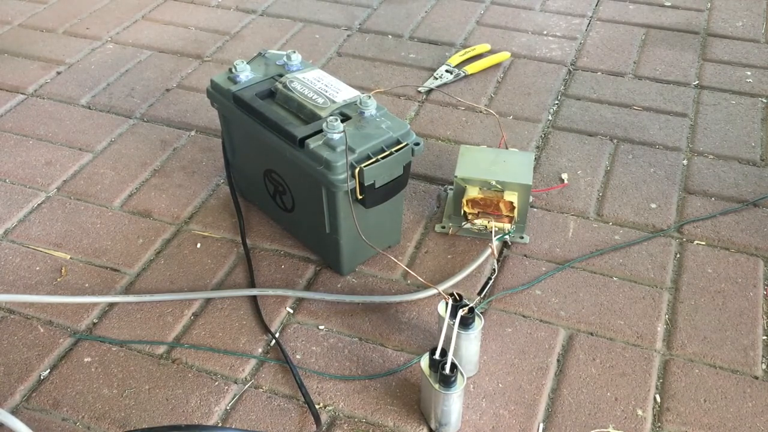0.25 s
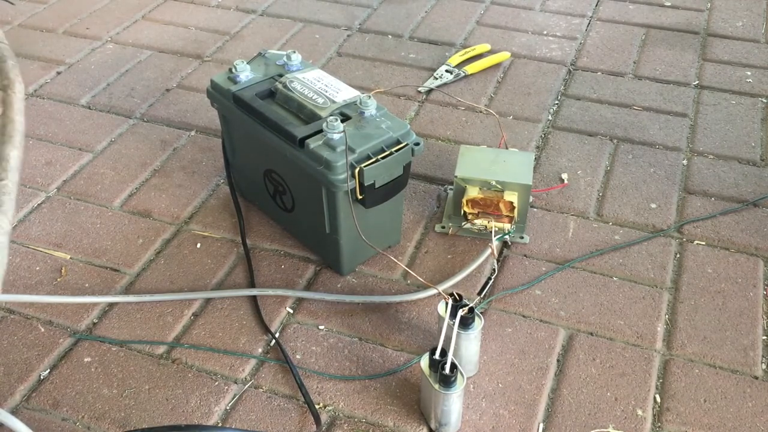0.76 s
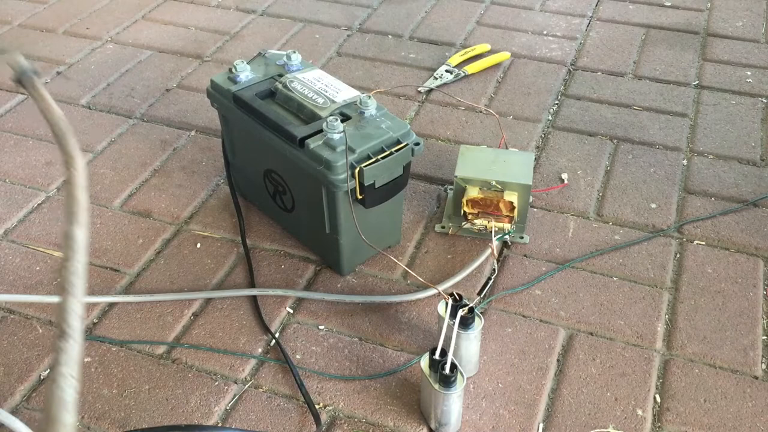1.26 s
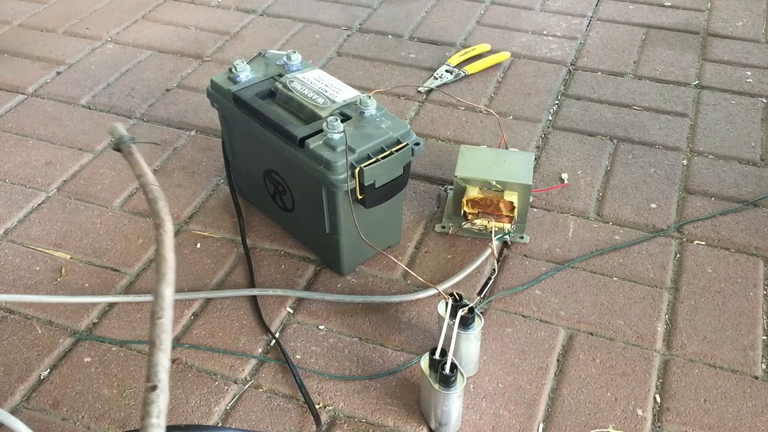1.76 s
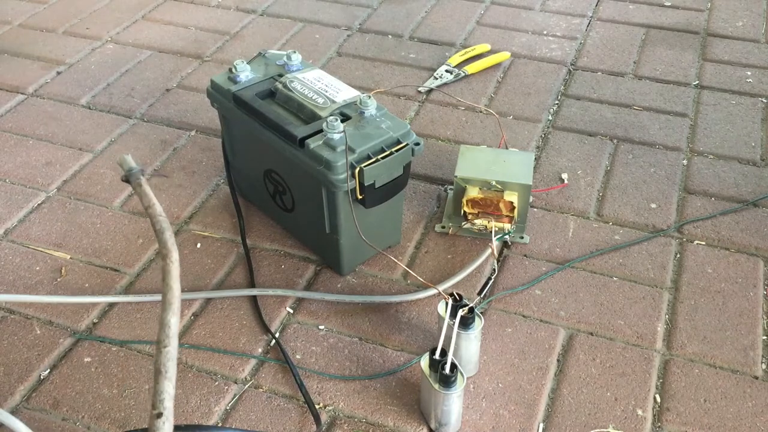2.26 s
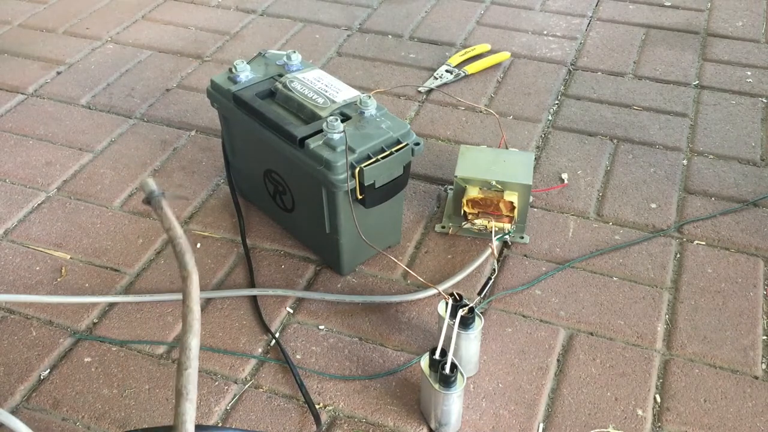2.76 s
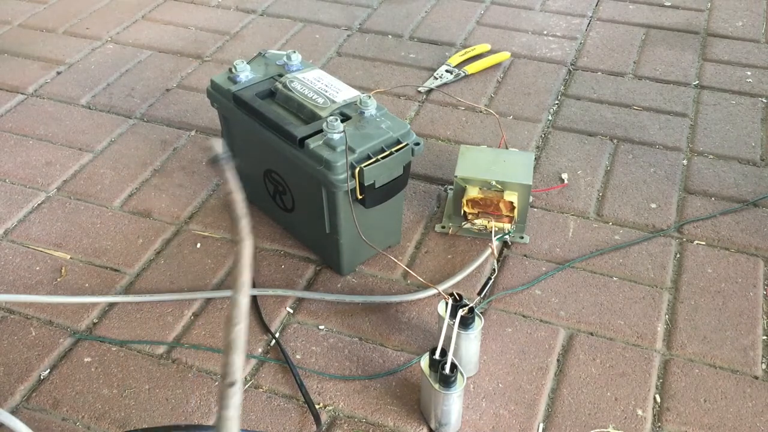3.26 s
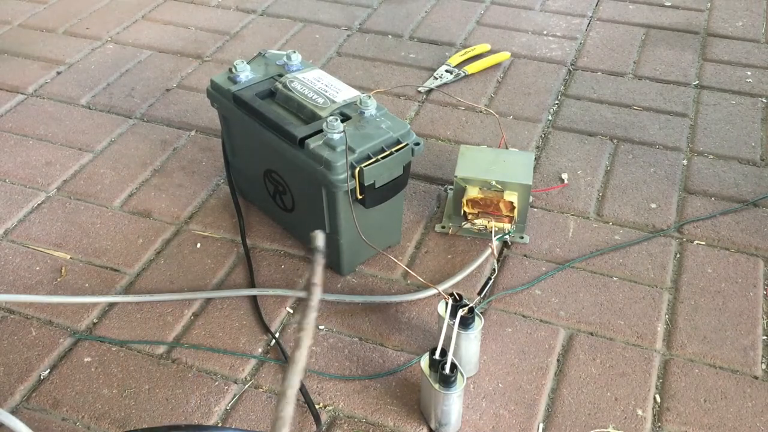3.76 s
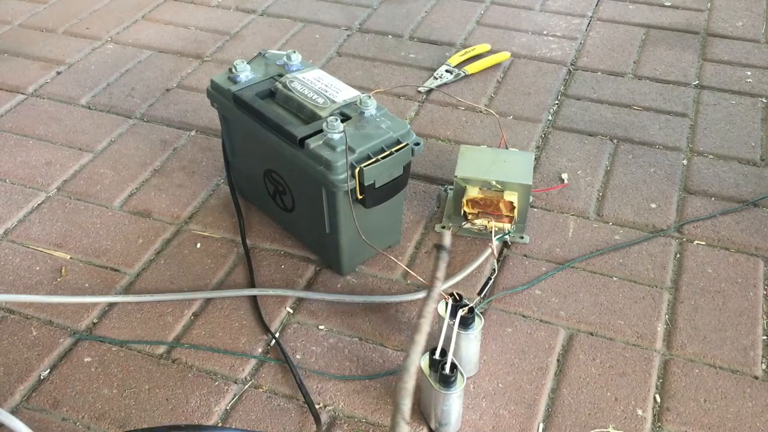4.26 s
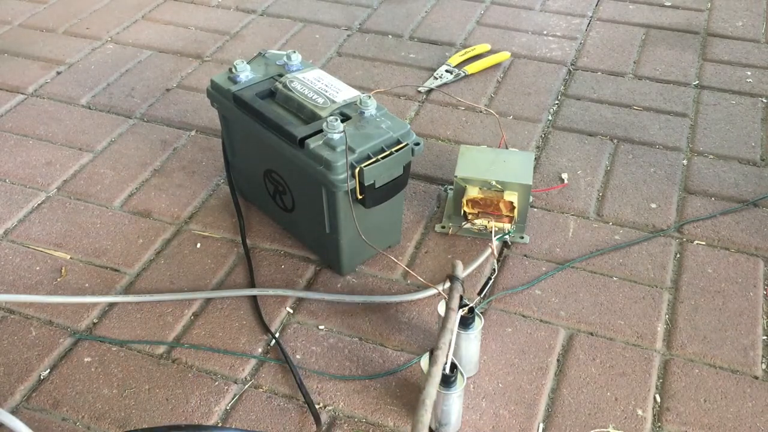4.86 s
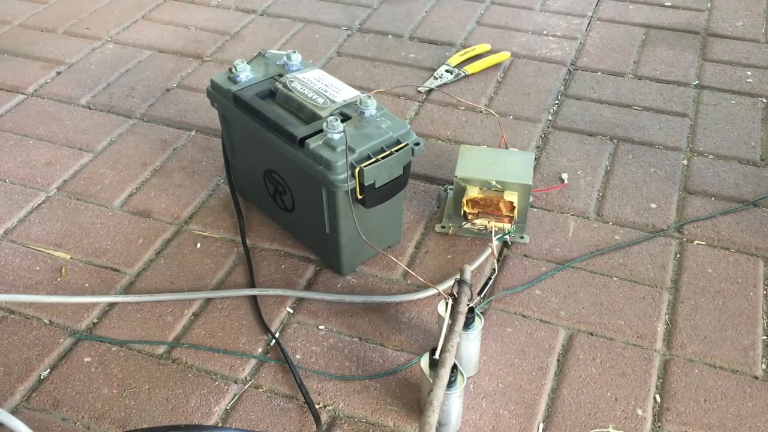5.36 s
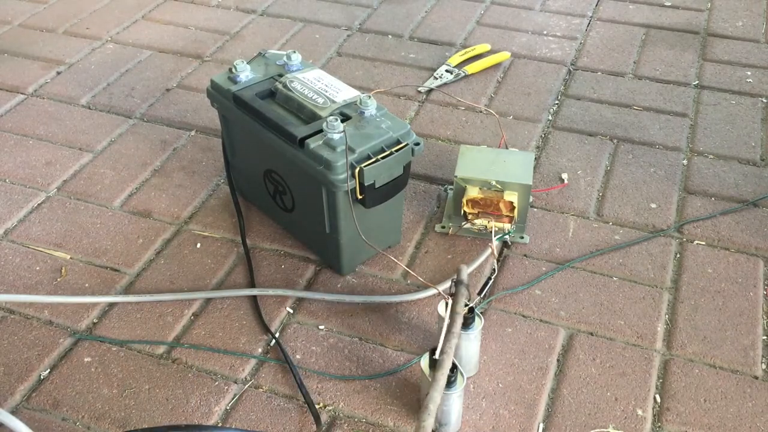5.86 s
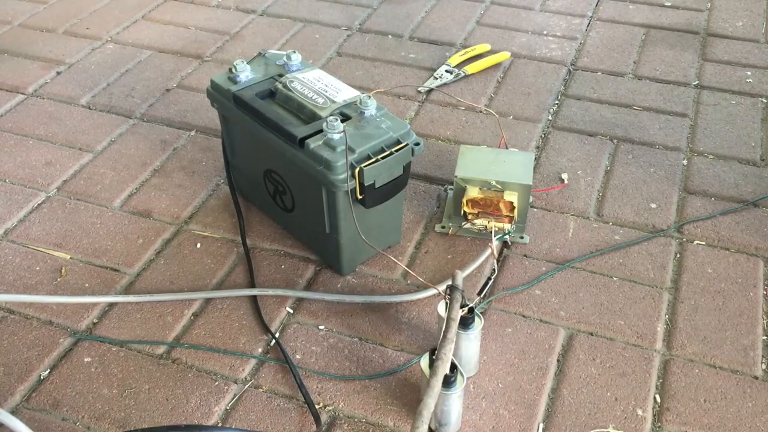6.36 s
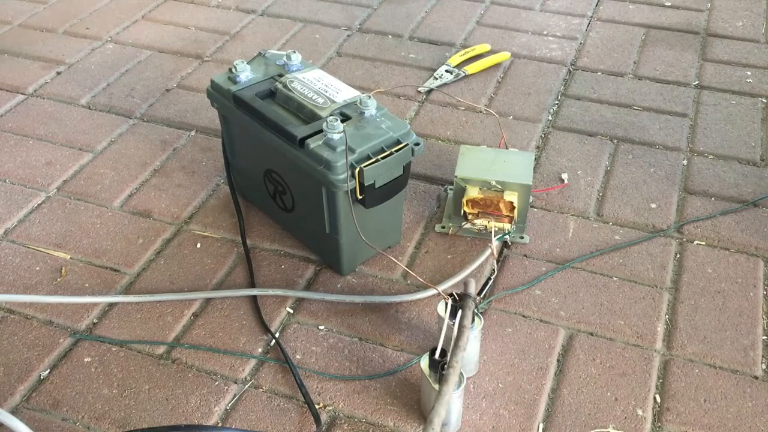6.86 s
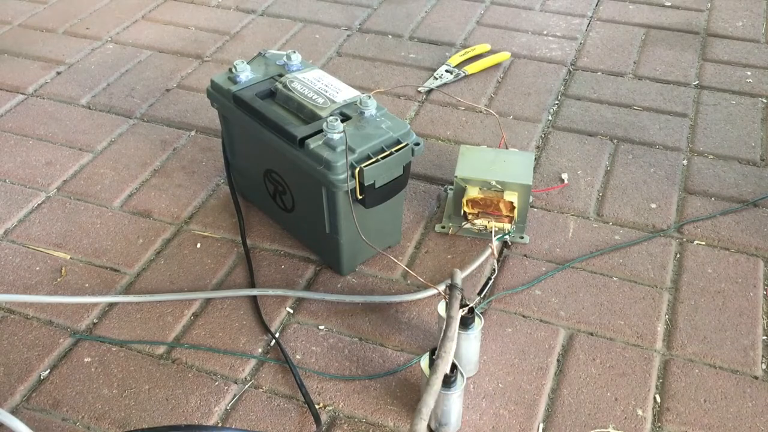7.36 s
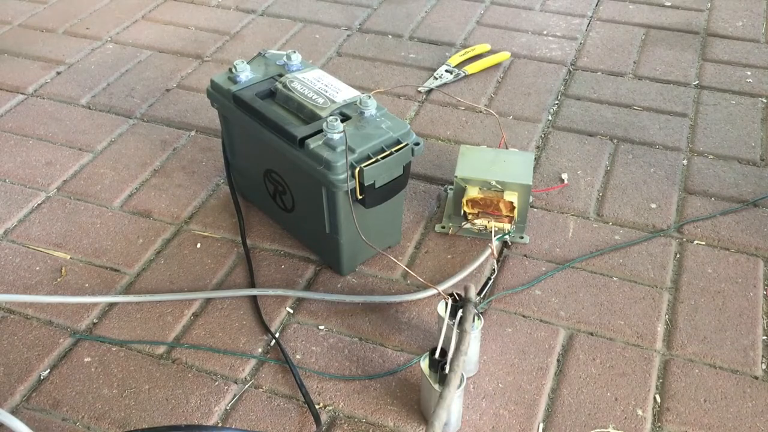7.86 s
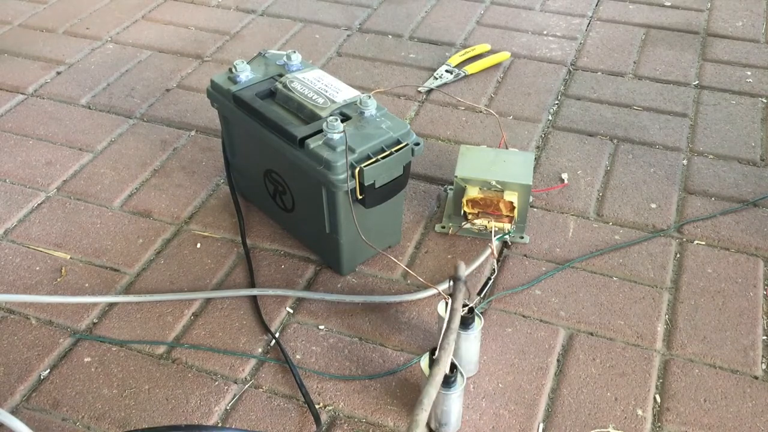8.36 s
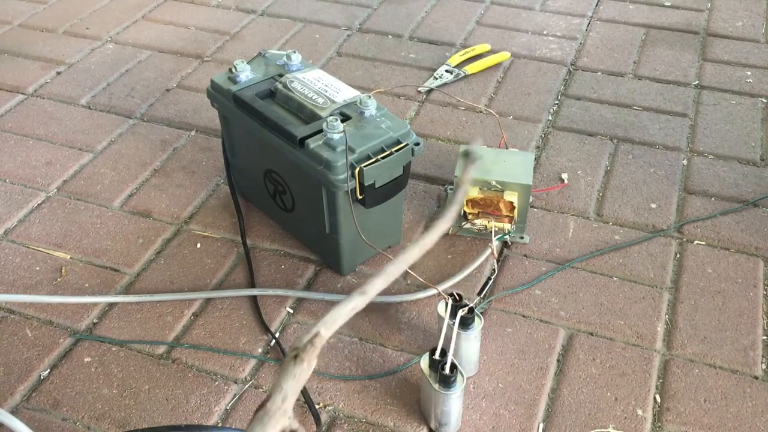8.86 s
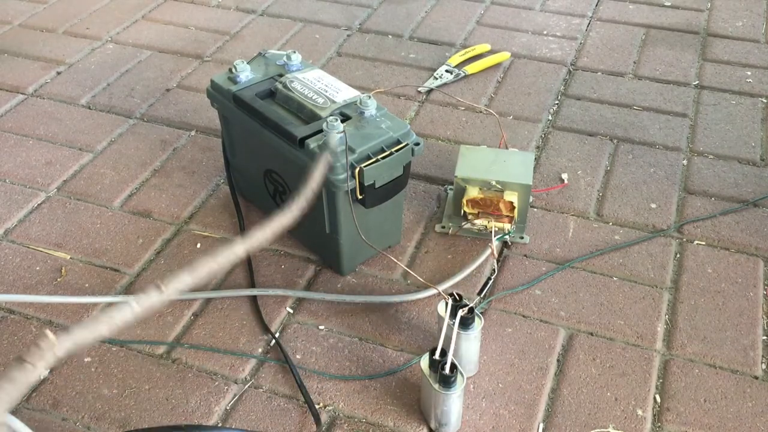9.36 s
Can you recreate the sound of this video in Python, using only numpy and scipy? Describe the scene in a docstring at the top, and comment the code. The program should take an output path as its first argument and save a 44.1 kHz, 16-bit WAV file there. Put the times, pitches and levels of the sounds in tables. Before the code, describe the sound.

Faint mains hum outdoors, a sudden sharp high-voltage snap with brief metal ringing, then light stick ticks on metal amid wind, chirps and rasping insects.

```python
"""One sharp crack with a tiny spark before it: charged high-voltage capacitors short on a brick patio.
Noise shocks make the crack, the yard scatters it, and decaying sines ring on in the jolted metal.
The transformer's steady sines stop at the crack; later a stick taps, rubs and nudges the metal.
Around it: gusts of filtered noise for light wind, pulsed tones and noise bands for rasping insects,
gliding tones for distant birds, and a soft outdoor wash."""
import sys
import numpy as np
from scipy import signal
from scipy.fft import rfft, irfft
from scipy.io import wavfile
from scipy.ndimage import uniform_filter1d

SR = 44100
rng = np.random.default_rng(int(sys.argv[2]) if len(sys.argv) > 2 else 0)


def to_wav(sig):
    """Store sig (one row per channel, or 1-D mono) as 16-bit WAV at the path in sys.argv[1].

    Samples outside -1..1 are clipped; the rate is SR.
    """
    pcm = np.clip(np.atleast_2d(sig), -1, 1) * 32767
    pcm = np.round(pcm).astype(np.int16)
    wavfile.write(sys.argv[1], SR, pcm.T)  # frames by channels


N = 424683
TIME = np.arange(N) / SR

# pressure shocks of the discharge and their first bounces: (time [s], level [dB], nominal decay time [s])
DISCHARGE_SHOCKS = [(2.6095, -37, .008), (2.614, -26, 0.0023), (2.6156, -11, .002), (2.6161, -7, 0.0016),
                    (2.618, -15.5, 0.0041), (2.6212, -11, 0.001)]
STRIKE_S = DISCHARGE_SHOCKS[2][0]  # the first strong shock


def gain_of(db):
    """Decibels to amplitude."""
    return 10 ** (np.asarray(db) / 20)


def evened(x):
    """Scales to rms 1."""
    return x / np.sqrt(np.mean(x ** 2) + 1e-20)


def read(points, hz):
    """Interpolates a frequency table on a log-frequency axis."""
    f, value = np.transpose(points)
    return np.interp(np.log(hz + 1), np.log(f + 1), value)


def add(mix, s, sound):
    """Mixes a sound in at time s, cut at the end of the mix."""
    part = mix[max(round(s * SR), 0):][:len(sound)]
    part += sound[:len(part)]


def noise(colour):
    """Steady noise with the given spectrum, rms 1."""
    hz = np.fft.rfftfreq(N, 1 / SR)
    spectrum = rfft(rng.standard_normal(N)) * gain_of(read(colour, hz))
    return evened(irfft(spectrum, N))


def band(centre_hz, width_hz):
    """Noise in one bell-shaped band, rms 1; around 0 Hz it is a slow random drift."""
    hz = np.fft.rfftfreq(N, 1 / SR)
    bell = np.exp(-((hz - centre_hz) / width_hz) ** 2)
    return evened(irfft(rfft(rng.standard_normal(N)) * bell, N))


def causal(colour, size=4096):
    """Minimum-phase impulse response of a spectrum, energy 1."""
    level_db = read(colour, abs(np.fft.fftfreq(size, 1 / SR)))
    log_gain = np.log(gain_of(np.maximum(level_db, -80)))
    response = np.fft.ifft(np.exp(np.conj(signal.hilbert(log_gain)))).real[:size // 2]
    return response / np.linalg.norm(response)


def modes(table, size=SR // 2):
    """Decaying sines of a struck object, from rows of (pitch [Hz], level [dB], t60 [s])."""
    t = TIME[:size]
    return sum(gain_of(db - 60 * t / t60) * np.sin(2 * np.pi * hz * t) for hz, db, t60 in table)


def spells(rows, rise_s, fall_s):
    """Gain over time of a source that comes and goes: each spell rises, holds and falls."""
    gain = 0
    for start, end, db in rows:
        ramp = np.minimum((TIME - start) / rise_s, (end - TIME) / fall_s)
        gain = gain + gain_of(db) * np.clip(ramp, 0, 1)
    return gain


def burst(decay_s, rise_s=.0003):
    """A sudden puff of noise that dies away, about equally strong at all pitches."""
    t = TIME[:SR // 10]
    shape = np.exp(-t / decay_s)
    rise = 1 - np.exp(-t / rise_s)
    spectrum = rfft(rise * shape * rng.standard_normal(len(t)))
    flat = irfft(spectrum / (abs(spectrum) + 1e-12), len(t))
    # flattening smears the puff in time, so it is shaped again, gently
    puff = flat * rise * shape ** (1 / 4)
    return evened(puff) * np.sqrt(np.mean(shape ** 2))


def yard_tail(size=256, clump_db=1.5):
    """Uneven clumps of scatter from paving, walls and plants, treble dying first; energy 1."""
    # reverberation time of the yard: (frequency [Hz], t60 [s])
    yard_t60 = [(250, 0.33), (1000, 0.29), (2500, 0.23), (5000, .21), (9000, .2), (14000, .18)]
    hz, t, z = signal.stft(rng.standard_normal(SR), SR, nperseg=size)
    z = z * gain_of(clump_db * rng.standard_normal(len(t)))
    decay = gain_of(-60 * t / read(yard_t60, hz)[:, None])
    tail = signal.istft(z * decay, SR, nperseg=size)[1]
    return tail / np.linalg.norm(tail)


def discharge(echo_db=3, echo_delay_s=.003, case_db=-2, ring_hz=1143.4, ring_s=1.05):
    """A tiny first spark, the main shocks, the yard's echo and the jolted metal, its ring cut off near ring_s."""
    # colour of the shocks: (frequency [Hz], density [dB per Hz])
    crack_colour = [(80, -44), (200, -29), (330, -8.5), (640, -14), (1250, -11), (2000, -14.5),
                    (3400, -11.5), (4300, -6.5), (5000, -8), (6300, -4), (7900, -4), (9400, 3), (10600, -7),
                    (11800, -3.5), (12900, -16), (15100, -8), (16000, -19)]
    # colour of the yard's echo: (frequency [Hz], density [dB per Hz])
    yard_colour = [(100, -40), (240, -14), (350, -1), (650, -7.5), (1400, -2), (2300, -1), (3200, -4.5),
                   (4400, -3), (5000, -4), (7000, -0.5), (9300, 2.5), (10500, -5), (15800, -11.5)]
    # short rings of the cans, case and leads: (pitch [Hz], level before case_db [dB], t60 [s])
    case_modes = [(350, -32, .18), (474, -33.5, .13), (556, -44, .35), (799, -34, .18), (933, -40, .16),
                  (1111, -35, .13), (1180, -32.5, .14), (1312, -36.5, .13), (1469, -31.5, .16),
                  (1876, -38, .12), (2206, -34, .12), (2251, -41.5, .45), (2278.5, -42.5, .45),
                  (3031, -35, .12), (4242, -32, .12), (4549, -31, .1), (5901, -29, .11), (6230, -29, .1),
                  (6900, -28, .08), (8457, -26, .07), (9140, -26, .11), (9425, -19, .05)]
    # three close modes of the long metal ring, beating together: (offset from ring_hz [Hz], level [dB], t60 [s])
    ring_modes = [(-3.8, -33, .54), (-.26, -47.3, 2.9), (.26, -47.3, 2.9)]
    shocks, out = np.zeros(N), np.zeros(N)
    for s, db, decay_s in DISCHARGE_SHOCKS:
        add(shocks, s, gain_of(db) * burst(decay_s))
    add(out, 0, signal.oaconvolve(shocks, causal(crack_colour)))
    echo = signal.oaconvolve(yard_tail(), causal(yard_colour))
    add(out, STRIKE_S + echo_delay_s, gain_of(echo_db) * echo)
    add(out, STRIKE_S, gain_of(case_db) * modes(case_modes))
    ring = modes(np.array(ring_modes) + [ring_hz, 0, 0], size=2 * SR)
    cutoff = np.exp(-(TIME[:len(ring)] / ring_s) ** 10)
    add(out, STRIKE_S, ring * cutoff)
    return out


def stick(contact_s=.0013, scrape_s=.018, scrape_db=-19.5, grit_db=4, knocks_db=1, wet_db=-13):
    """Each touch is a bright metal tick, a gritty scrape and a damped knock whose pitch depends on the spot."""
    # touches on the terminals:
    # (time [s], level [dB], knock against tick before knocks_db [dB], pitch of knock [Hz])
    taps = [(6.011, -61, 7, 3900), (6.0875, -43.5, -17, 3900), (6.3794, -59, 4, 3840),
            (6.5273, -57, 6, 3800), (6.7578, -31.5, -7, 4050), (6.774, -51, 4, 3860),
            (6.7815, -48, 4, 3900), (6.7864, -46, -8, 2800), (6.7935, -47, 4, 5300),
            (6.8723, -44, 4.5, 4095), (6.886, -50, 0, 3970), (7.0082, -48.5, -15, 4000),
            (7.0755, -51, -1, 4000), (7.347, -40, -1, 3700), (7.3505, -50, 4, 2900), (7.361, -54, -3, 5400),
            (7.8555, -52, 5, 1450), (7.9006, -48, -1, 5400), (8.2727, -48.5, 1, 2900),
            (8.321, -50, -2, 3700), (9.2673, -58, -15, 3900)]
    # colour of the metal tick: (frequency [Hz], density [dB per Hz])
    tick_colour = [(880, -52), (1600, -25), (2020, -15), (3960, -1), (5000, -9), (6600, -6), (7500, -2),
                   (8500, -8), (10200, -4.5), (11800, -5.5), (12500, -16), (13500, -10), (16000, -22)]
    # modes of the knock: (ratio to its pitch [1], relative level [dB], t60 [cycles of the knock's pitch])
    knock_modes = [(.55, -13, 40), (.8, -6, 35), (1, 2.5, 45), (1.15, -1, 30)]
    out, tick = np.zeros(N), causal(tick_colour)
    for s, db, knock_db, hz in taps:
        scrape = burst(scrape_s)
        unevenness = evened(uniform_filter1d(rng.standard_normal(len(scrape)), size=60))
        grit = evened(gain_of(grit_db * unevenness))
        contact = gain_of(db) * (burst(contact_s) + gain_of(scrape_db) * scrape * grit)
        knock = modes(np.array(knock_modes) * [hz, 1, 1 / hz], size=SR // 10)
        knock = knock / np.linalg.norm(knock)
        add(out, s, signal.fftconvolve(contact, tick))
        add(out, s, gain_of(knock_db + knocks_db) * signal.fftconvolve(contact, knock))
    return out + gain_of(wet_db) * signal.oaconvolve(out, yard_tail())[:N]


def handling(thud_t60=0.3, thud_hz=310, thud_width_hz=500):
    """The stick rubs along the leads with a thin hiss and nudges the cans with dull thuds."""
    # faint rubs: (time [s], level [dB], half length [s])
    rub_rows = [(4.756, -77, .05), (5.7, -80, .03), (9.29, -76, 0.022)]
    # nudges against the cans: (time [s], level [dB])
    thud_rows = [(5.58, -62.5), (6.772, -61)]
    rubs = sum(gain_of(db) * np.exp(-((TIME - s) / half_s) ** 2) for s, db, half_s in rub_rows)
    thuds = sum((TIME > s) * gain_of(db - 60 * abs(TIME - s) / thud_t60) for s, db in thud_rows)
    return rubs * band(12800, 2800) + thuds * band(thud_hz, thud_width_hz)


def transformer(off_s=2.616, waver_db=1.0, swell_s=.3):
    """Wavering mains harmonics while charging, and a low noise drone near their pitch that stays afterwards."""
    # mains hum: (pitch [Hz], level [dB])
    hum_tones = [(120, -66.5), (240, -81.5), (360, -81.5), (480, -77), (600, -82.5)]
    # low drone, strongest just before the crack: (start [s], end [s], level [dB])
    drone_spells = [(1.45, 2.75, -58), (2.5, 9.9, -65)]
    hum = 0
    for hz, db in hum_tones:
        hum = hum + gain_of(db) * np.sqrt(2) * np.sin(2 * np.pi * (hz * TIME + rng.random()))
    hum = hum * (TIME < off_s) * gain_of(waver_db * band(0, 2.6))
    return hum + spells(drone_spells, swell_s, swell_s) * band(120, 4.83)


def insects(stroke_s=.0586, first_s=.016, stroke_half_s=.01, rasp_hz=8595, waver_hz=28, scatter_db=-7,
            rasp_rise_s=.6, rasp_stop_s=.08, high_bed_db=-81, low_bed_db=-85,
            high_rise_s=2.0, low_rise_s=.8, fade_s=.35):
    """A near insect sounds a wavering tone per wing stroke, scattered by leaves; two far choruses are noise bands."""
    # bouts of the near rasp, swelling in and stopping short: (start [s], end [s], level [dB])
    rasp_bouts = [(-1, .16, -70.5), (1.15, 2.28, -72.5), (2.3, 7.52, -74), (7.6, 9.9, -71.5)]
    # swells of the high far chorus, added to its steady bed: (start [s], end [s], level [dB])
    high_swells = [(-2, .2, -78), (.5, 2.35, -76), (2.4, 6.5, -81), (7.8, 10.2, -78.5)]
    # swells of the low far chorus, added to its steady bed: (start [s], end [s], level [dB])
    low_swells = [(-.1, 1.9, -85), (4.3, 5.4, -85), (6.6, 8.7, -81.8)]
    uneven_time = TIME - first_s + .0015 * band(0, .95)
    from_peak = (uneven_time + stroke_s / 2) % stroke_s - stroke_s / 2
    tone = np.sin(2 * np.pi * np.cumsum(rasp_hz + waver_hz * band(0, 160)) / SR)
    pulses = np.exp(-(from_peak / stroke_half_s) ** 2)
    strokes = evened(pulses * tone * gain_of(1.5 * band(0, 10)))
    scatter = gain_of(scatter_db) * band(rasp_hz, 130)
    near = spells(rasp_bouts, rasp_rise_s, rasp_stop_s) * (strokes + scatter)
    high = gain_of(high_bed_db) + spells(high_swells, high_rise_s, fade_s)
    high = high * band(8080, 440) * gain_of(1.8 * band(0, 25))  # with a fast shimmer of level
    low = gain_of(low_bed_db) + spells(low_swells, low_rise_s, fade_s)
    return near + high + low * band(5260, 135)


def note(start_hz, end_hz, length, buzz, buzz_hz=380, jitter=.35):
    """One bird note, rms 1: a glide with a fast, uneven flutter of pitch."""
    t = TIME[:int(length * SR)]
    uneven = evened(uniform_filter1d(rng.standard_normal(len(t)), 80))
    flutter = buzz * np.sin(2 * np.pi * np.cumsum(buzz_hz * (1 + jitter * uneven)) / SR)
    pitch = np.geomspace(start_hz, end_hz, len(t)) * (1 + flutter)
    return evened(signal.windows.tukey(len(t), .6) * np.sin(2 * np.pi * np.cumsum(pitch) / SR))


def birds(upper_hz=4350, upper_end_hz=4100, upper_share=.8, upper_harsh=.07,
          lower_hz=3600, lower_end_hz=3080, lag_s=.013, lower_harsh=.088,
          twitter_db=-80, count=44, warble=.02, warble_hz=60, dry_db=-5.5, wet_db=-2.3):
    """Falling chirps from both sides of a syrinx, high voice first; peeps, twitter, warbled whistles; all echo."""
    # every level here is ahead of dry_db and wet_db
    # harsh two-voiced chirps: (time [s], level [dB], length [s], high voice against low [dB])
    chirps = [(0.325, -59.5, .069, -1), (1.608, -60.5, .067, -1), (4.338, -60.5, .087, -1),
              (5.808, -62.5, .085, 0), (7.82, -55, .105, -6), (8.548, -60.5, .07, -3)]
    # fainter answering peeps: (time [s], level [dB], pitch [Hz])
    peeps = [(.8, -70.5, 4310), (1.985, -65, 3566), (2.795, -71, 4970), (2.87, -62, 3500),
             (2.91, -67, 4100), (3.07, -70, 4900), (3.54, -67, 3490), (4.1, -71.5, 3590),
             (5.668, -70, 3600), (6.191, -67.5, 3620), (7.43, -69.5, 3550), (8.345, -69.5, 3520),
             (9.6, -64.5, 3600)]
    # a farther bird's slurred whistles: (time [s], level [dB], length [s], start pitch [Hz], end pitch [Hz])
    whistles = [(2.79, -64, .055, 2270, 2050), (4.55, -69, .04, 2130, 2160), (4.615, -70, .035, 2270, 2290),
                (4.68, -71, .08, 2230, 2100), (5.025, -61, .065, 2700, 2480), (5.11, -70, .11, 2400, 2580),
                (5.245, -66.5, .04, 2400, 2480), (5.59, -68, .03, 2290, 2370),
                (5.62, -63, .035, 2200, 2800), (5.67, -63, .042, 2720, 2600), (5.715, -65, .04, 2400, 2000),
                (5.765, -65, .03, 2080, 2360)]
    out = np.zeros(N)
    for s, db, length, upper_db in chirps:
        upper = note(upper_hz, upper_end_hz, upper_share * length, upper_harsh, buzz_hz=240)
        lower = note(lower_hz, lower_end_hz, length, lower_harsh, buzz_hz=240)
        add(out, s, gain_of(db + upper_db) * upper)
        add(out, s + lag_s, gain_of(db) * lower)
    for s, db, hz in peeps:
        add(out, s, gain_of(db) * note(hz, 1.035 * hz, 0.041, 0.085))
    # far twitter at random moments
    for when, size, high, glide in rng.random((count, 4)):
        hz = 2900 + 2200 * high
        twitter = note(hz, hz * (.92 + .14 * glide), 0.045, .03)
        add(out, when * N / SR, gain_of(twitter_db + 2 * size) * twitter)
    for s, db, length, from_hz, to_hz in whistles:
        add(out, s, gain_of(db) * note(from_hz, to_hz, length, warble, buzz_hz=warble_hz))
    return gain_of(dry_db) * out + gain_of(wet_db) * signal.oaconvolve(out, yard_tail())[:N]


def wind(wind_db=-1, calm_db=-64, rise_s=.14, fall_s=.16, lump_db=2.4):
    """Lumpy low noise swelling in gusts, with a few single low bumps of air on the microphone."""
    # gusts added to the calm, both ahead of wind_db: (start [s], end [s], level [dB])
    gusts = [(0, 1.65, -59.7), (1.5, 3.7, -57), (3.55, 4.65, -59), (4.8, 6.4, -56), (6.5, 7.6, -57.5),
             (7.7, 9.7, -58.6)]
    # colour of the rumble: (frequency [Hz], density [dB per Hz])
    wind_colour = [(15, -44.5), (28, -25), (42, 2), (60, -2), (110, -3.5), (160, -9.5), (240, -22.5),
                   (400, -32), (900, -60)]
    # soft bumps: (time [s], level [dB], pitch [Hz], half length [s])
    bumps = [(5.892, -39, 82, 0.016), (6.207, -43, 74.4, 0.025), (6.591, -41, 61.6, .022),
             (6.71, -41, 62.4, .016), (7.45, -45, 70, .018), (7.762, -34, 70, 0.007)]
    strength = gain_of(calm_db) + spells(gusts, rise_s, fall_s)
    rumble = evened(noise(wind_colour) * gain_of(lump_db * band(0, 9.7)))
    out = gain_of(wind_db) * strength * rumble
    for s, db, hz, half_s in bumps:
        swell = np.exp(-((TIME - s) / half_s) ** 2)
        out += gain_of(db) * swell * np.cos(2 * np.pi * hz * (TIME - s))
    return out


def air(wash_db=-66, hiss_db=-74):
    """Distant outdoor wash of slowly drifting noise, and a fine hiss that ends with the crack."""
    # colour of the outdoor air: (frequency [Hz], density [dB per Hz])
    air_colour = [(30, -10), (200, 5), (450, 1.5), (1000, -0.5), (1700, -4), (2900, -5.5), (4200, -5.5),
                  (6000, -10), (9600, -14.5), (10400, -22), (11000, -18.5), (16000, -24)]
    # fine hiss while the capacitors charge: (frequency [Hz], density [dB per Hz])
    hiss_colour = [(1000, 0), (5000, -1), (9000, -4), (10400, -12), (11500, -6), (15500, -10)]
    wash = gain_of(wash_db + .4 * band(0, 3)) * noise(air_colour)
    return wash + gain_of(hiss_db) * noise(hiss_colour) * (TIME < STRIKE_S)


def scene():
    """All sources at one microphone."""
    metal = discharge() + stick() + handling()
    surroundings = transformer() + insects() + birds() + wind() + air()
    return (metal + surroundings)[None]


def record(dry, ceiling=.72, edge_hz=15900):
    """The crack's peaks overload the microphone softly; then the band limit."""
    rounded = dry / (1 + (dry / ceiling) ** 4) ** (1 / 4)
    lowpass = signal.firwin(401, edge_hz, window=("kaiser", 8), fs=SR)
    return signal.oaconvolve(rounded, lowpass[None], "same")


dry = scene()
out = record(dry)
to_wav(out)
```